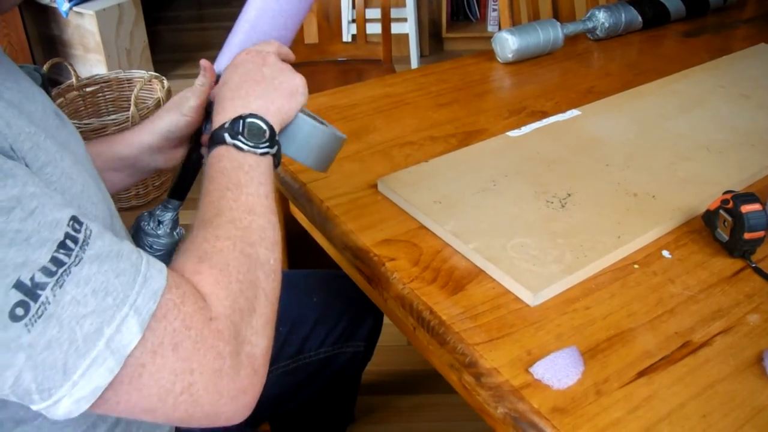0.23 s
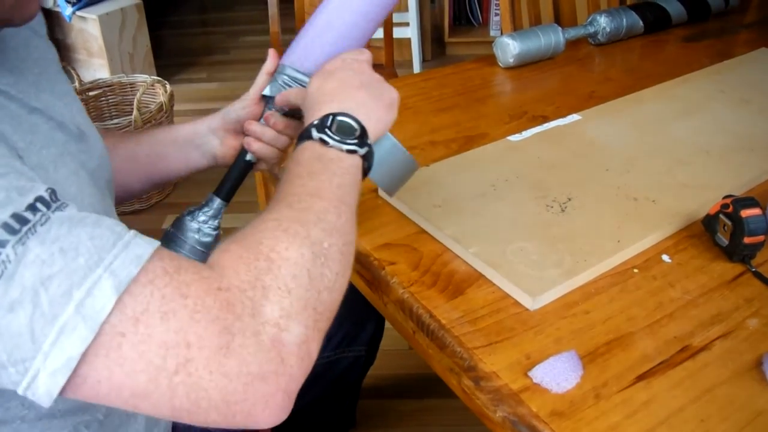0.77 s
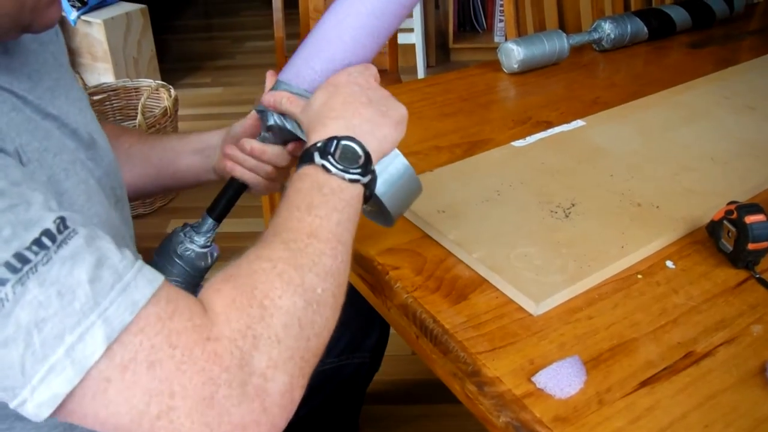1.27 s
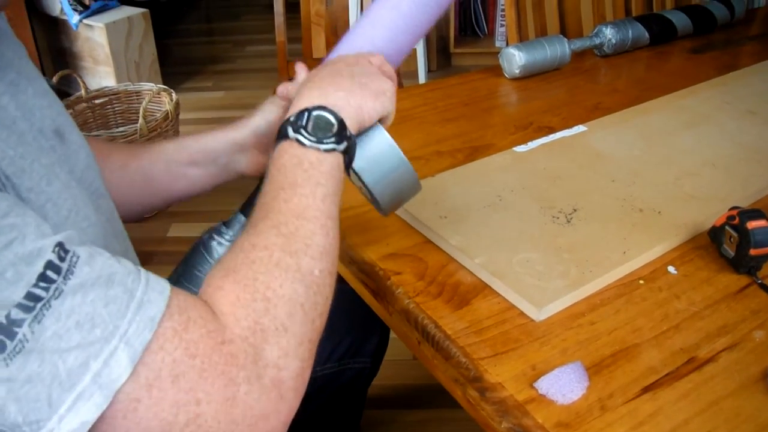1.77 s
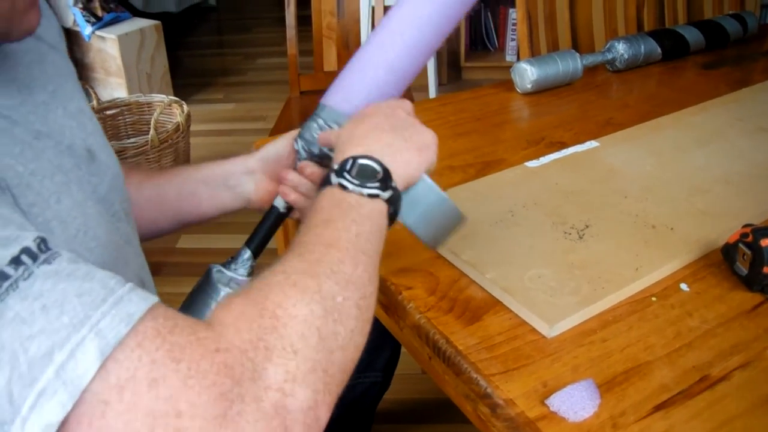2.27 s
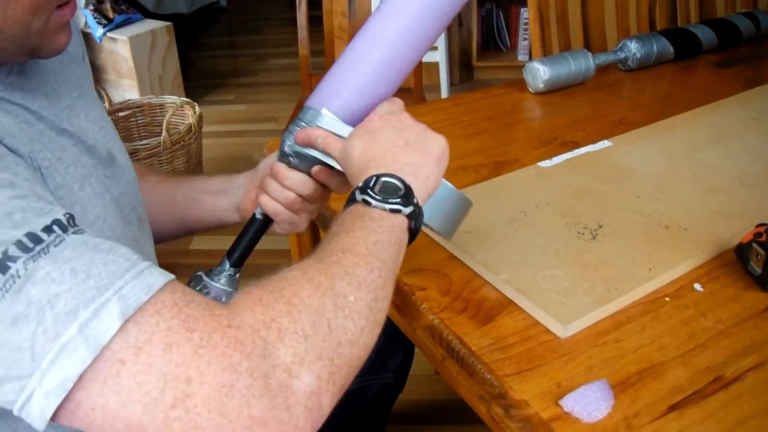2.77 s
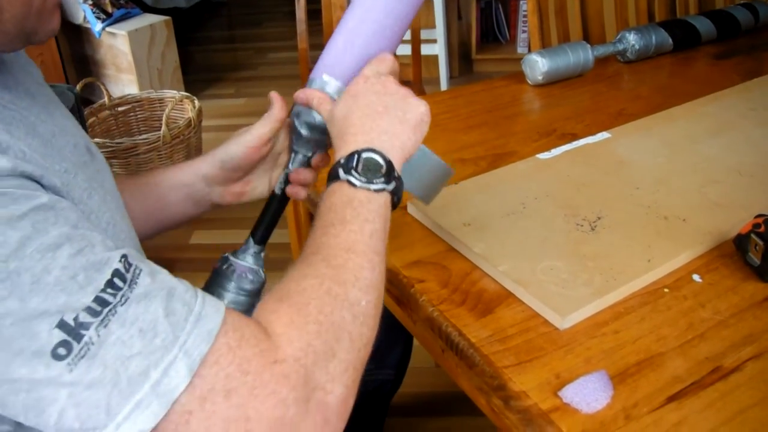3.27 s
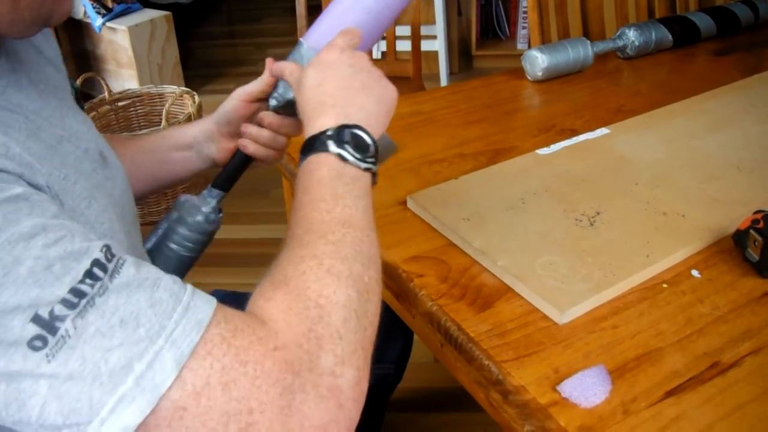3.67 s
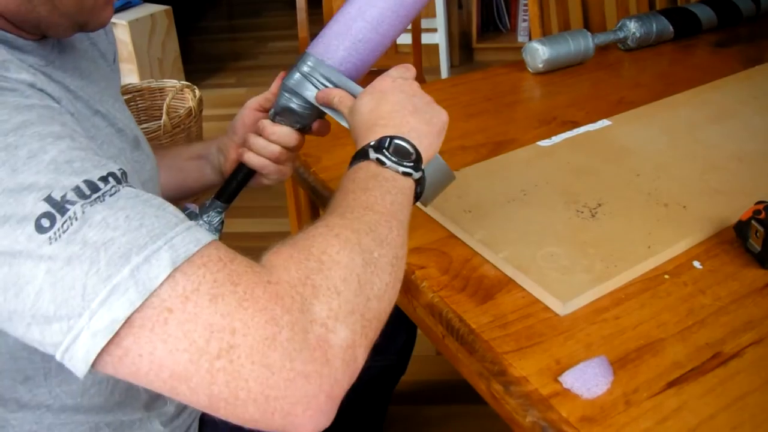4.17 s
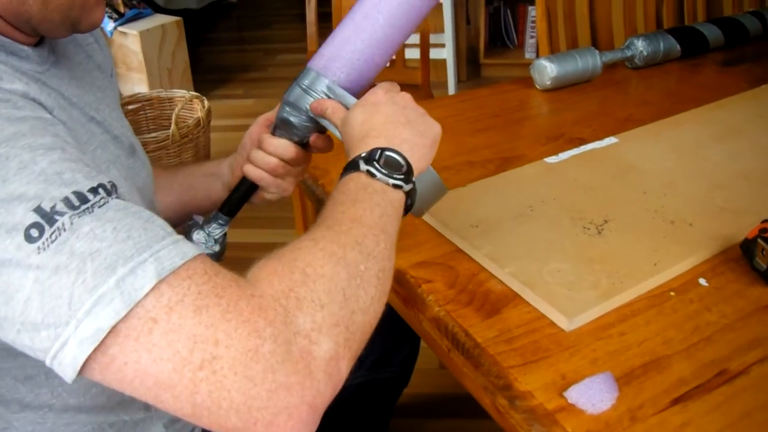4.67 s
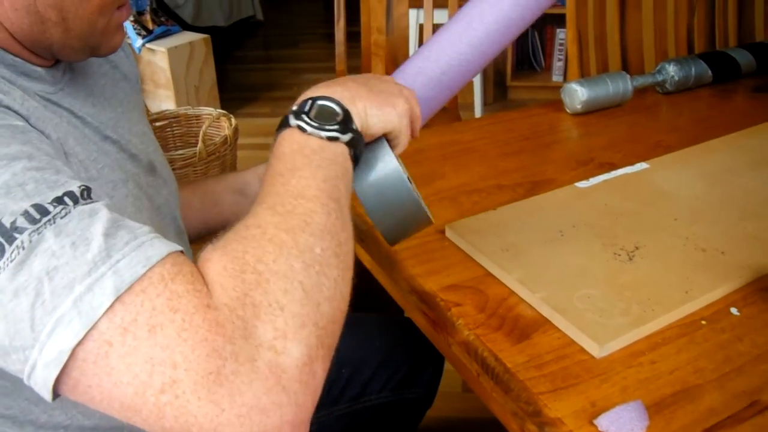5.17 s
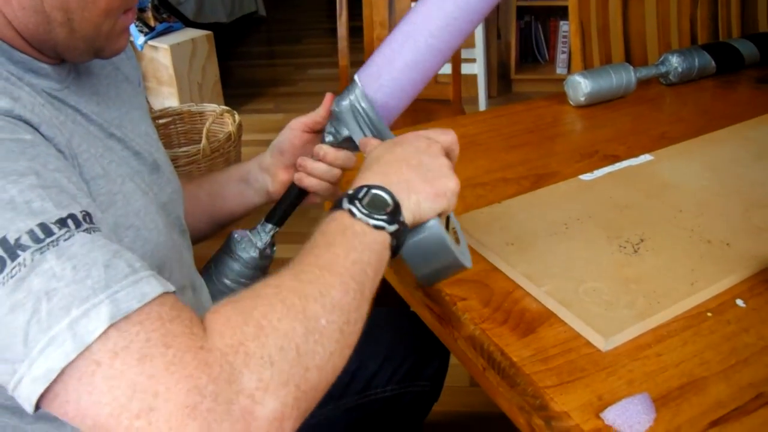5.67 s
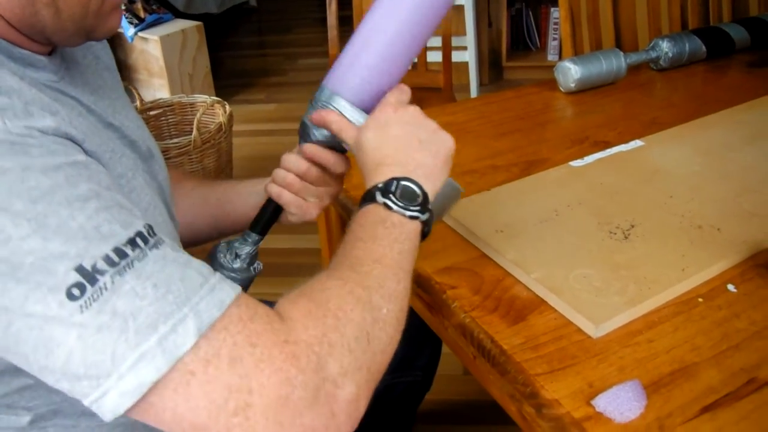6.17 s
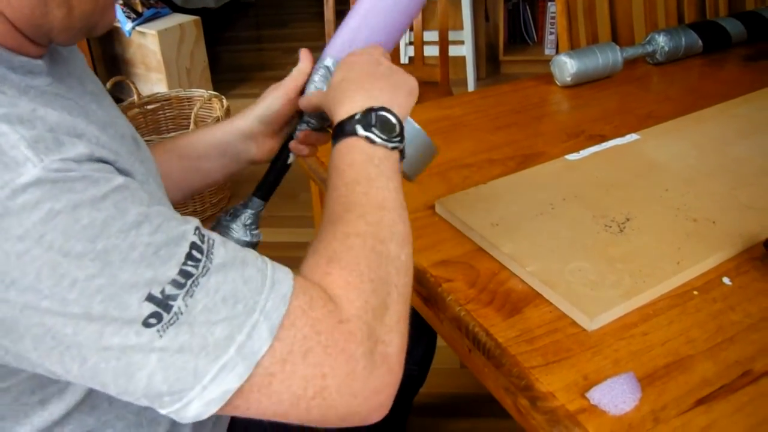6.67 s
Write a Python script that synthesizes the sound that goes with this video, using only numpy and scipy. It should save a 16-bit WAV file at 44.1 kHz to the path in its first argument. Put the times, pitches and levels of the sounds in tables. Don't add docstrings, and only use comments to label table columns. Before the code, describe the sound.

A live wooden room, close camera microphone with constant hiss, faint mains hum and buzz. At 0 s the tail of an earlier tape rip dies away, with small crinkles and a tick at 0.25. At 0.5-0.65 s cloth tape rips off its roll in a quick cluster of cracks; a very sharp crack lands at 1.07, then mostly quiet ticking. A thicker, lower rip comes at 2.2, single cracks at 2.55 and 2.7, a light snap burst at 3.27, then a heavy ripping burst from 3.65 to 3.95. A dull low bump sounds at 4.0. From 4.6 to 4.85 a bright, rapid crackling pull slows into separate snaps until 5.17. Two cracks follow at 5.8, soft crinkles, light peeling snaps around 6.55, and a last double crack at 6.9. Loud cracks distort and echo; a thin focus-motor whine flickers in short pulses throughout.

```python
import sys
import numpy as np
from scipy import signal
from scipy.fft import rfft, irfft
from scipy.io import wavfile
from scipy.ndimage import uniform_filter1d

SR = 44100
rng = np.random.default_rng(int(sys.argv[2]) if len(sys.argv) > 2 else 0)


def waveform_to_disk(signal):
    frames = np.transpose(np.atleast_2d(signal))
    scaled = np.clip(frames, -1, 1) * 32767
    samples = np.round(scaled).astype(np.int16)
    wavfile.write(sys.argv[1], SR, samples)


def decibels_to_gain(level_db):
    exponent = np.asarray(level_db, float) / 20
    return 10 ** exponent


N = 305172
LEAD = SR // 2
FRAME_HZ = 30.03


def at_hz(points, hz):
    table = np.array(points)
    return np.interp(np.log(hz + 1), np.log(table[:, 0]), table[:, 1])


def resonance(x, hz, width_hz):
    r = np.exp(-np.pi * width_hz / SR)
    feedback = [1, -2 * r * np.cos(2 * np.pi * hz / SR), r * r]
    return signal.lfilter([(1 - r * r) / 2, 0, (r * r - 1) / 2], feedback, x)


def high_pass(x, hz):
    return signal.sosfilt(signal.butter(2, hz, "high", fs=SR, output="sos"), x)


def colour(x, points):
    size = 8192
    level_db = at_hz(points, np.fft.rfftfreq(size, 1 / SR))
    cepstrum = irfft(np.log(decibels_to_gain(level_db)))
    cepstrum[1:size // 2] *= 2
    cepstrum[size // 2 + 1:] = 0
    response = irfft(np.exp(rfft(cepstrum)))
    return signal.fftconvolve(x, response)[:len(x)]


def lasting(rows, ms):
    return [(*row, ms) for row in rows]


def tape(slips, bass_cut_hz, flap_db, sharpness, broad_db, fade_ms=1.0, first_give=1.16, give_ms=0.41):
    # from this second on, pitch in Hz, width in Hz, share in dB.
    spans = [(0, 500, 310, -43), (.48, 450, 200, -24.5), (.59, 482, 142, -16), (1.06, 470, 680, -20),
             (2.17, 716, 600, -6.5), (2.2, 446, 94, -18.5), (2.55, 920, 860, -8.5), (2.7, 360, 288, -25.5),
             (3.26, 560, 596, -27), (3.63, 440, 390, -22), (3.79, 436, 163, -16.5), (4.0, 585, 800, -10),
             (4.55, 500, 710, -27.5), (4.69, 390, 200, -23.5), (4.88, 310, 248, -23.5),
             (5.09, 473, 800, -20), (5.3, 690, 500, 21), (5.77, 800, 800, -11.5), (6.52, 550, 500, -20.5),
             (6.59, 377, 77.6, -20), (6.86, 457, 597, -12.5)]
    span_starts = np.array(spans)[:, 0]
    strip, flap = np.zeros((2, N + 2 * LEAD)), np.zeros(N + 2 * LEAD)
    size = 900
    ms = np.arange(4 * size) / SR * 1000
    jerk = (ms == 0) * 1.0
    grains = rng.standard_normal((len(slips), size))
    for (s, db, hz, length_ms), grain in zip(slips, grains):
        at = LEAD + round(s * SR)
        fade = np.exp(-np.maximum(ms[:size] - 0.45 * length_ms, 0) / (fade_ms + 0.6 * length_ms))
        tear = grain * fade * (1 + first_give * np.exp(-ms[:size] / give_ms))
        both = np.array([tear, jerk[:size] * np.sqrt(np.sum(tear ** 2))])
        ring = resonance(both, hz, hz / sharpness)
        ring = ring / np.abs(ring[0]).max()
        broad = both / np.abs(tear).max()
        strip[:, at:at + size] += decibels_to_gain(db) * (ring + decibels_to_gain(broad_db) * broad)

        span = max(np.searchsorted(span_starts, s) - 1, 0)
        _, flap_hz, width_hz, share_db = spans[span]
        swing = resonance(resonance(jerk, flap_hz, width_hz), flap_hz, 4 * width_hz) * np.sign(grain[0])
        swing = swing / np.sqrt(np.sum(swing ** 2))
        flap[at:at + len(ms)] += decibels_to_gain(db + share_db + flap_db) * swing
    taut = high_pass(strip, bass_cut_hz)
    return np.vstack([taut, flap])[:, :N + LEAD]


def room(x, gap_ms=0.93, build_ms=0.56, lumpy_db=3.5, blend_s=0.088):
    # pitch in Hz, time to die by 60 dB in seconds, level in dB.
    bands = np.array([(200, 0.48, 7), (450, 0.59, 2), (800, 0.63, 3), (1490, 0.67, 0.5), (3700, 0.6, 0),
                      (5180, 0.6, 5), (11700, 0.56, -10)])
    t = np.arange(SR) / SR
    white, tail = rng.standard_normal((2, SR)), 0
    edges = 120 * 2 ** np.arange(0, 7.1, .5)
    for k, (low, high) in enumerate(zip(edges, edges[1:])):
        band = signal.sosfilt(signal.butter(2, [low, high], "band", fs=SR, output="sos"), white[k % 2])
        hz = np.sqrt(low * high)
        level_db, t60 = at_hz(bands[:, ::2], hz), at_hz(bands, hz)
        tail = tail + band * decibels_to_gain(level_db - 60 * t / t60)
    tail = tail * (1 - np.exp(-np.maximum(t * 1000 - gap_ms, 0) / build_ms))
    walls = uniform_filter1d(rng.standard_normal(SR), size=90)
    tail = tail * decibels_to_gain(lumpy_db * walls / walls.std() * np.exp(-t / blend_s))
    return signal.fftconvolve(x, tail / np.sqrt(np.sum(tail ** 2)))[:len(x)]


def camera_noise(floor_db=-45):
    # pitch in Hz, level in dB per Hz.
    hiss_tone = [(18, -19), (60, -21.5), (110, -4), (384, -14), (822, -16.5), (1280, -21.5), (1720, -14),
                 (2200, -16), (2980, -20.5), (3870, -11), (5500, -20), (7470, -32), (15500, -36),
                 (16400, -47)]
    # pitch in Hz, level in dB rms.
    mains = [
        (100.056, -54),
        (200.11, -57.5),
    ]
    buzz_levels = [-76, -68, -59.5, -57.5, -60, -60, -63, -62, -64, -66, -68, -71, -74]
    t = np.arange(N) / SR
    hiss = colour(rng.standard_normal(N), hiss_tone)
    out = decibels_to_gain(floor_db) * hiss / hiss.std()
    for hz, db in mains:
        out = out + np.sqrt(2) * decibels_to_gain(db) * np.cos(2 * np.pi * (hz * t - .15))
    frames = FRAME_HZ * t + .145
    for multiple, db in enumerate(buzz_levels, start=1):
        out = out + np.sqrt(2) * decibels_to_gain(db) * np.cos(2 * np.pi * (multiple * frames + .39))
    return out


def creases():
    # start in seconds, peak in dB, ring in Hz.
    crinkles = [(0.1378, -12.5, 3270), (0.2383, -12, 5230), (0.2484, -5, 4320), (0.4615, -12, 4870),
                (0.4922, -4.5, 3300), (0.514, -4, 2870), (2.0627, -13.5, 2930), (3.0726, -9.5, 3260),
                (3.115, -6.5, 2620), (3.2365, 1, 3170), (3.467, -12, 2560), (3.6405, -5, 2320),
                (4.0633, -3, 2870), (4.4346, -1.5, 5650), (4.596, -10, 3380), (4.6086, -2, 5140),
                (4.901, 2.5, 3630), (5.144, -2, 2950), (5.7098, -13.5, 3880), (6.0039, -2.5, 4240),
                (6.1143, -9.5, 4930), (6.1738, -11.5, 1650), (6.2973, -15, 1690), (6.3304, -7.5, 1720),
                (6.3664, -11, 4020), (6.4277, -13, 3360), (6.5297, -9, 4030), (6.5489, -2, 2630),
                (6.8667, 0, 3080)]
    # start in seconds, peak in dB, ring in Hz.
    ticks = [(0.3806, -15, 3260), (0.4086, -14, 4150), (0.9846, -19, 3740), (1.421, -24, 3940),
             (1.4696, -15, 4040), (1.6114, -29, 2500), (1.6715, -19.5, 2460), (1.7267, -22, 3870),
             (1.786, -27, 3630), (1.842, -31, 1740), (1.907, -28, 4230), (1.9597, -22, 3580),
             (3.065, -14, 3520), (3.087, -21, 4030), (3.1238, -14.5, 3670), (4.2815, -18, 4730),
             (4.3094, -22.5, 4170), (4.408, -19, 3700), (4.4175, -19, 3920), (4.5796, -18, 4370),
             (5.372, -17, 4440), (5.4166, -17, 3080), (5.4541, -15.5, 3930), (5.5833, -21, 3120),
             (6.149, -25, 1770), (6.2037, -23, 1790), (6.303, -24, 3120), (6.393, -18, 3080),
             (6.4555, -21, 1680), (6.52, -15, 3360)]
    slips = lasting(crinkles, ms=1.9) + lasting(ticks, ms=2.4)
    small = tape(slips, bass_cut_hz=810, flap_db=-15.0, sharpness=2.36, broad_db=-8.5)
    return high_pass(small, 1200)


def focus_motor(hz=5270, level_db=-28, flutter=0.06, gear_db=-13, gear_hz=3600, gear_width_hz=2200):
    # first step in seconds, number of steps, step length in ms.
    hunts = [(.2, 4, 14), (.406, 1, 41), (1.302, 2, 14), (1.417, 1, 40), (2.132, 2, 14), (2.397, 5, 14),
             (3.53, 4, 14), (3.729, 1, 14), (5.261, 3, 14), (5.429, 7, 14), (5.65, 1, 41), (6.362, 4, 14),
             (6.516, 1, 10)]
    t, gate = np.arange(N) / SR, np.zeros(N)
    for first, steps, ms in hunts:
        for s in first + np.arange(steps) / FRAME_HZ:
            gate[round(s * SR):round((s + ms / 1000) * SR)] = 1
    waver = resonance(rng.standard_normal(N), hz, 280)
    gear = resonance(resonance(rng.standard_normal(N), gear_hz, gear_width_hz), gear_hz, gear_width_hz)
    whine = np.sin(2 * np.pi * hz * t) + flutter * waver / waver.std()
    whine = whine + decibels_to_gain(gear_db) * gear / gear.std()
    return decibels_to_gain(level_db) * uniform_filter1d(gate, size=50) * whine


def glue_slips():
    # start in seconds, peak in dB, ring in Hz, tearing time in ms.
    earlier_slip = (-0.26, 14, 3798, 5.5)
    # start in seconds, peak in dB, strip ring in Hz, tearing time in ms.
    loud_cracks = [(0.2549, 6, 4870, 1.5), (0.5017, 8.5, 2530, 1.2), (0.5472, 10, 2070, 0.84),
                   (0.5751, 15.5, 2770, 0.62), (0.6036, 12, 4000, 1.2), (1.0711, 21, 5670, 2.4),
                   (1.101, 11, 5600, 2), (1.179, 6.5, 2840, 0.75), (2.177, 9.5, 1550, 3.4),
                   (2.211, 16, 1390, 8.7), (2.2484, 13.5, 3070, 1.8), (2.267, 15.5, 3440, 2.4),
                   (2.5648, 12.5, 6050, 3.8), (2.7085, 12.5, 3940, 2.2), (2.742, 15.5, 4100, 2.3),
                   (3.2726, 7.5, 2270, 0.7), (3.754, 15, 2010, 2.2), (3.8024, 17, 2020, 8.2),
                   (3.8402, 16.5, 2160, 9.4), (3.858, 13.5, 2250, 1.3), (3.8736, 13.5, 2100, 1.3),
                   (3.8856, 12.5, 2360, 8.6), (4.649, 11.5, 3330, 0.58), (4.685, 17.5, 2200, 0.71),
                   (4.7549, 15, 4600, 1.7), (5.7863, 14, 4970, 2.9), (5.818, 9, 3670, 3.5),
                   (6.872, 11, 2530, 3.9), (6.9052, 13.5, 2900, 1)]
    # start in seconds, peak in dB, strip ring in Hz.
    snaps = [(0.5272, 4.5, 2950), (0.6542, 8.5, 2960), (3.2824, 8.5, 2800), (3.2905, 7, 3230),
             (3.6547, 6, 2060), (3.6782, 8, 2280), (4.0153, 2.5, 3370), (4.618, -1, 3800),
             (4.6635, 11.5, 4130), (4.726, 12, 4150), (4.7828, 14, 4700), (4.7982, 8, 4090),
             (4.863, -2, 4290), (4.893, 4.5, 3030), (4.9259, 2.5, 3700), (4.9459, 4, 3310),
             (4.9794, 7, 3420), (4.9975, 6, 4800), (5.0304, 8, 3640), (5.1024, 11, 4840),
             (5.1374, 7.5, 3250), (5.166, 7, 4070), (6.5367, 2.5, 3320), (6.5547, -6, 1870),
             (6.5625, -7, 3600), (6.5728, -3, 3180), (6.6038, 7.5, 3120), (6.6245, 2.5, 3320),
             (6.6415, 6.5, 3500), (6.6562, 5, 2400)]
    slips = [earlier_slip, *loud_cracks, *lasting(snaps, ms=2.08), *stick_slip()]
    return tape(slips, bass_cut_hz=1010, flap_db=17.0, sharpness=1.42, broad_db=-1)


def stick_slip(count=14, gap_spread=0.25, slacken_db=4, spread_db=1.5, pitch_spread=0.15, slip_ms=1.3, ms_spread=0.46):
    # start in seconds, length in seconds, level in dB, strip ring in Hz, mean gap between slips in ms.
    runs = [(0.561, 0.073, 10.5, 1860, 6.5), (1.074, 0.032, 0, 4800, 8.8), (2.22, 0.024, 12, 1570, 5.4),
            (2.2777, 0.038, -1, 2710, 15.3), (3.2783, 0.0036, 1.5, 2080, 6.0),
            (3.6502, 0.014, 3, 2150, 11.0), (3.811, 0.02, 9.5, 1870, 8.0), (3.9028, 0.038, 2.5, 2400, 7.0),
            (4.677, 0.034, 8, 4200, 9.0), (4.7347, 0.044, 10.5, 4100, 8.6), (4.8086, 0.046, 8.5, 4150, 9.5),
            (6.9086, 0.009, 12.5, 1820, 5.5), (4.612, 0.022, -4, 4600, 4.5)]
    slips = []
    draws = rng.standard_normal((len(runs), 4, count))
    for (start, length, db, hz, gap_ms), draw in zip(runs, draws):
        gaps = gap_ms / 1000 * np.exp(gap_spread * draw[0])
        age = np.cumsum(gaps) - gaps[0]
        level_db = db - slacken_db * age / length + spread_db * draw[1]
        level_db = level_db - 200 * (age > length)
        ring_hz = hz * np.exp(pitch_spread * draw[2])
        tearing_ms = slip_ms * np.exp(ms_spread * draw[3])
        slips += zip(start + np.minimum(age, length), level_db, ring_hz, tearing_ms)
    return slips


def knocks():
    # start in seconds, peak in dB, pitch in Hz, time to die by 60 dB in seconds.
    bumps = [
        (3.279, -23, 200, 0.018),
        (4.017, -4, 141, 0.023),
        (4.598, -19, 163, 0.03),
        (5.457, -22.5, 150, 0.036),
        (5.505, -31, 715, 0.024),
        (5.584, -26.5, 760, 0.021),
    ]
    t, out = np.arange(N + LEAD) / SR - LEAD / SR, 0
    for s, db, hz, t60 in bumps:
        age = np.maximum(t - s, 0)
        out = out + decibels_to_gain(db - 60 * age / t60) * np.sin(2 * np.pi * hz * age)
    return out


def scene(near_flap_db=-6, small_room_db=-5, room_db=-8.5):
    # pitch in Hz, level in dB.
    microphone = [(60, -10.5), (300, 3), (900, -4.5), (1500, 1.5), (2300, -3), (4800, -3), (6000, -3),
                  (7200, -15.5), (7750, -16), (8300, -20), (11000, -43.5), (16000, -58)]
    crease_share = decibels_to_gain(np.array([[0], [small_room_db], [0]]))
    near, all_round, flap = glue_slips() + creases() * crease_share
    tail = room(all_round) + room(flap)
    at_port = near + decibels_to_gain(near_flap_db) * flap + knocks() + decibels_to_gain(room_db) * tail
    air = colour(at_port, microphone)[LEAD:]
    return (air + focus_motor())[None]


def roll_off(x):
    return signal.sosfilt(signal.butter(12, 16470, fs=SR, output="sos"), x)


def record(dry):
    clipped = np.clip(dry, -1, 1)
    line = high_pass(clipped, 140) + camera_noise()
    whistle_band = resonance(line, 7800, 420)
    return roll_off(line - 0.76 * whistle_band)


dry = scene()
out = record(dry)
waveform_to_disk(out)
```